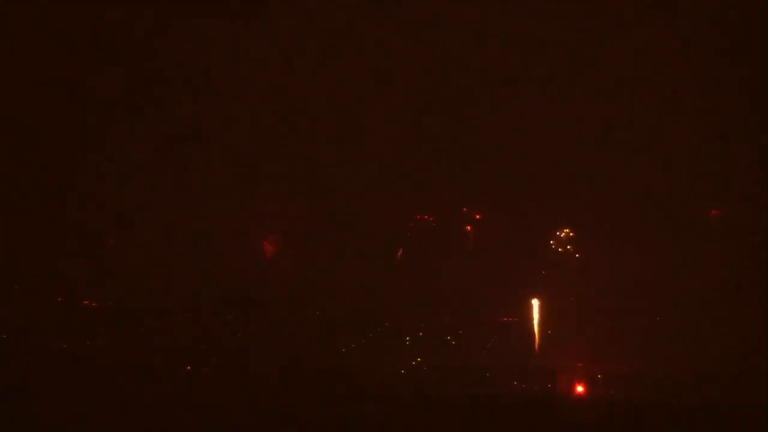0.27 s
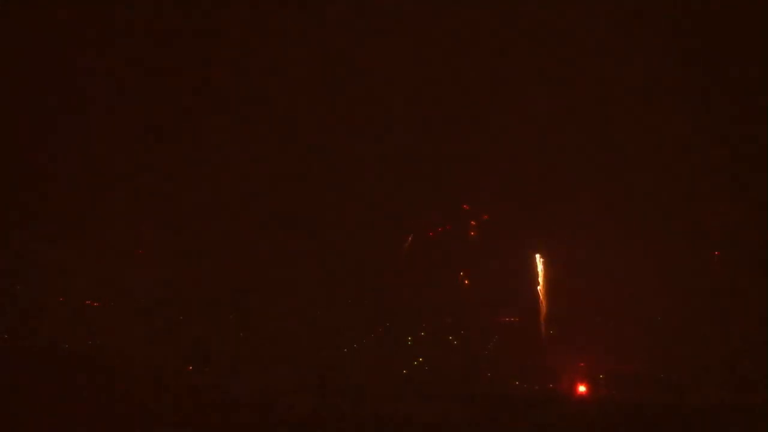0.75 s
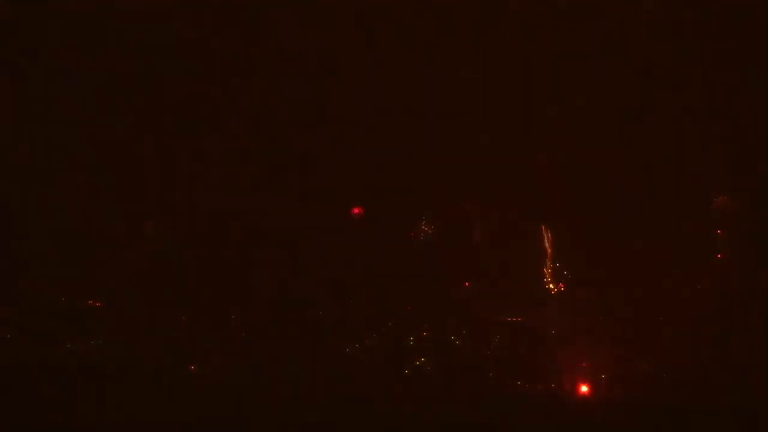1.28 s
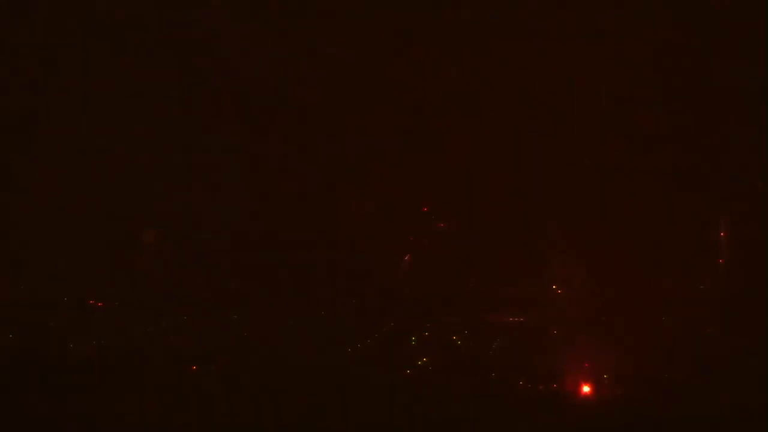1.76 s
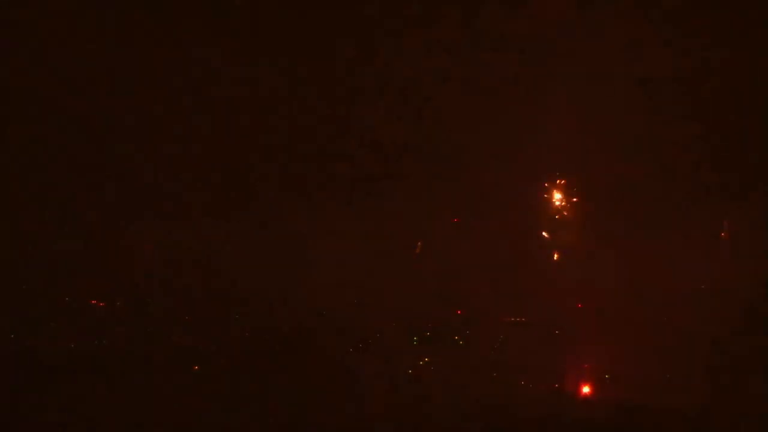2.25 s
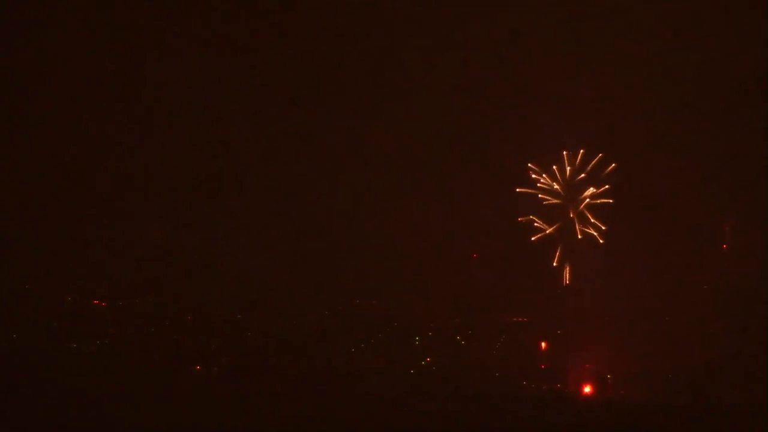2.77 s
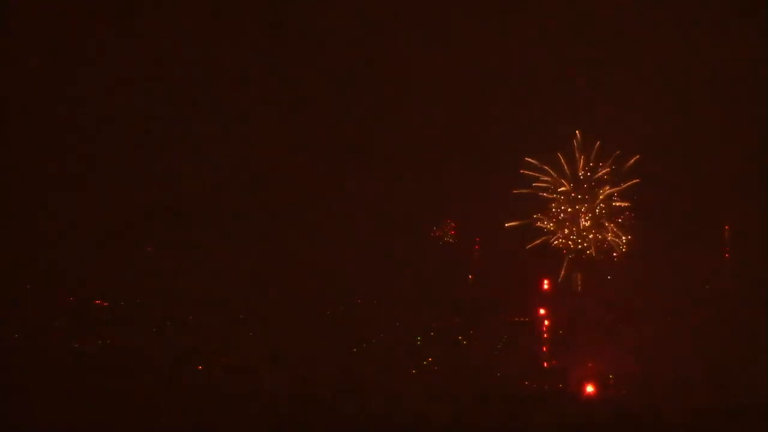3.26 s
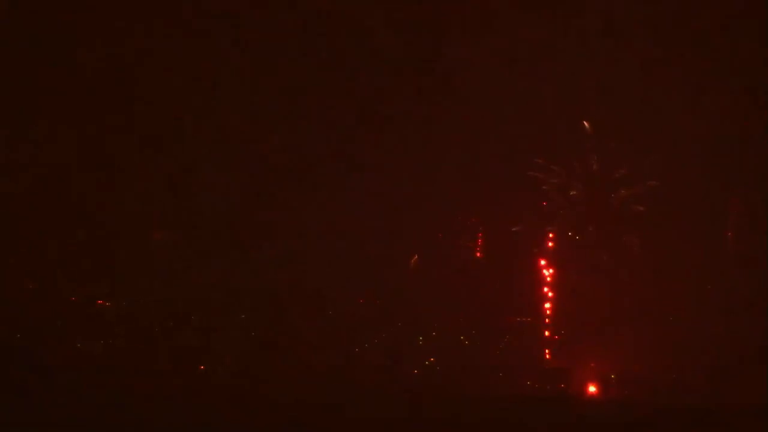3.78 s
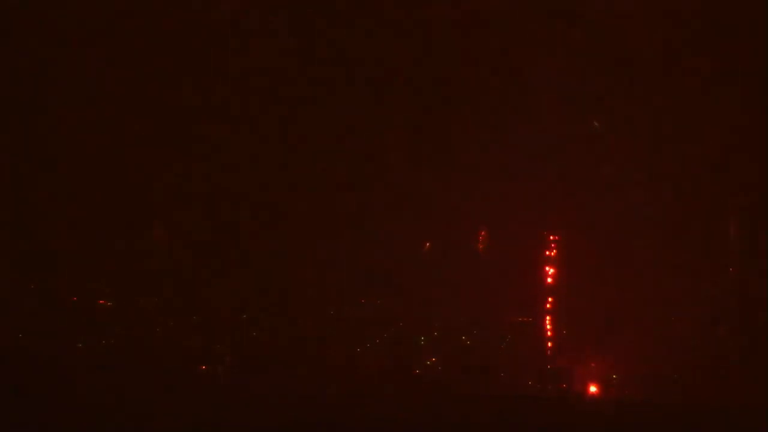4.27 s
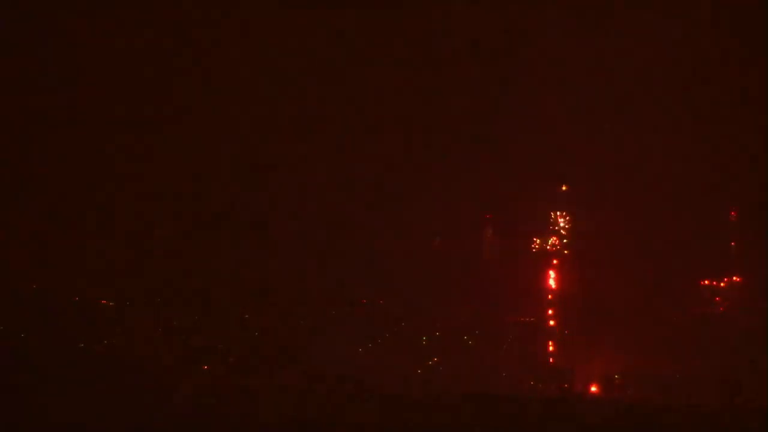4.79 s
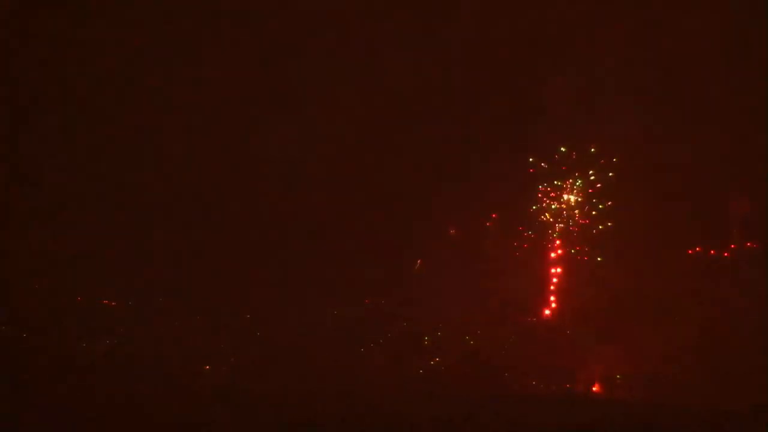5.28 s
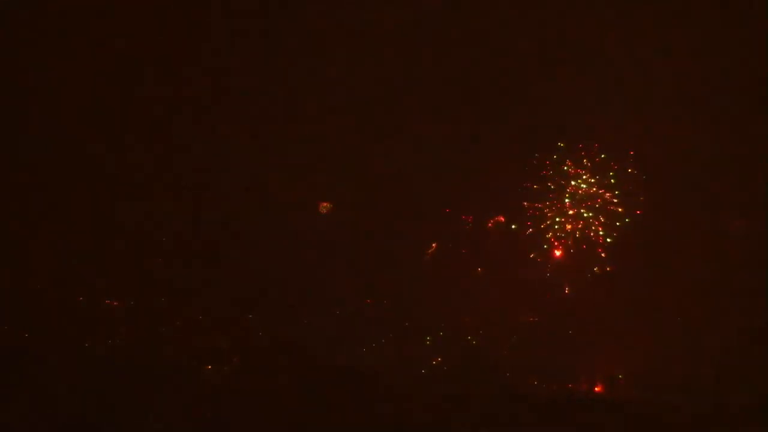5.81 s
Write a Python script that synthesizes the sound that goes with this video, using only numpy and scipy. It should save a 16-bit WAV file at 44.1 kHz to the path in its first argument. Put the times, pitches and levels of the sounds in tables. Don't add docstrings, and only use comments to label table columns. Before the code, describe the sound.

Outdoors, far from the launch sites, mortar booms, dull knocks, shell bangs and dry cracks overlap with short echoes off buildings. The middle thins to separate pops, then one violent crack breaks through, followed by a deep boom and crowded bangs to the end. The sound is dark and compressed, faintly ticking, with a constant rumble of faraway fireworks beneath.

```python
import sys
import numpy as np
from scipy import signal
from scipy.fft import rfft, irfft
from scipy.io import wavfile
from scipy.ndimage import uniform_filter1d

SR = 44100
rng = np.random.default_rng(int(sys.argv[2]) if len(sys.argv) > 2 else 0)


def wav_record(signal):
    frames = np.transpose(np.atleast_2d(signal))
    bounded = np.clip(frames, -1, 1)
    quanta = np.round(bounded * 32767).astype(np.int16)
    wavfile.write(sys.argv[1], SR, quanta)


def invert_db(x):
    u = np.asarray(x, float) / 20
    return 10 ** u


N = 266364

# [f/Hz, level/dB per Hz]
DISTANCE_COLOUR = [(20, -32), (60, -13), (130, -4), (330, 0.5), (470, -3.5), (700, -14), (1000, -21),
                   (1530, -14.5), (2000, -22), (2300, -30.5), (2750, -31), (2990, -24.5), (3250, -33.5),
                   (3550, -41), (4800, -51), (5150, -62), (5600, -65.5), (6000, -100)]


def band(lo_hz, hi_hz):
    hz = np.maximum(np.arange(2049) * SR / 4096, 1)
    f, db = np.transpose(DISTANCE_COLOUR)
    gain = invert_db(np.interp(np.log(hz), np.log(f), db))
    gain = gain / np.sqrt((1 + (lo_hz / hz) ** 6) * (1 + (hz / hi_hz) ** 6))
    cepstrum = irfft(np.log(gain + 1e-7))
    cepstrum[1:2048] *= 2
    cepstrum[2049:] = 0
    response = irfft(np.exp(rfft(cepstrum)))
    return response / np.sqrt(np.sum(response ** 2))


def through(x, response):
    return signal.fftconvolve(x, response)[:len(x)]


def add(out, s, sound):
    i = int(s * SR)
    out[i:i + len(sound)] += sound[:N - i]


def pulse(hz, cycles, rise):
    turns = np.arange(int(8 * SR / hz)) * hz / SR
    shape = -np.sin(2 * np.pi * turns) * turns ** rise * np.exp(-turns / cycles)
    return shape / np.abs(shape).max()


def thuds(table, t60_s, cycles, rise, late_s, echo_db, spread_db, first_s, count=40):
    out = np.zeros(N)
    chance = rng.random((len(table), 3, count))
    for (s, db, hz, share_db), (when, size, sign) in zip(table, chance):
        lag = first_s + t60_s * when
        echo_level_db = echo_db + share_db - 60 * lag / t60_s + spread_db * size
        echoes = invert_db(echo_level_db) * np.sign(sign - .5)
        train = np.zeros(SR)
        train[0] = 1
        np.add.at(train, np.minimum(lag * SR, SR - 1).astype(int), echoes)
        train = train[:int(lag.max() * SR) + 4000]
        add(out, s + late_s, invert_db(db) * through(train, pulse(hz, cycles, rise)))
    return out


def shocks(table, t60_s, shock=1, rise_s=0.0016):
    out = np.zeros(N)
    t = np.arange(SR // 4) / SR
    snap = 0.73 * np.exp(-(t / 0.0026) ** 2) * (1 - np.exp(-t / rise_s))
    ground_s = 0.0022
    direct = np.zeros(len(t))
    direct[[8, 8 + int(ground_s * SR)]] = -1
    bands = [band(1050, 2300), band(2300, 3600), band(3600, 9000)]
    noises = rng.standard_normal((len(table), 2, len(t)))
    for (s, db, edge_db, top_db, tail_db), (grit, diffuse) in zip(table, noises):
        tail = invert_db(tail_db - 60 * t / t60_s) * (1 - np.exp(-t / 0.0058))
        for response, share_db in zip(bands, [-5.5, edge_db - .5, top_db - 10.5]):
            front = through(shock * direct + grit * snap, response)
            front = front / np.abs(front).max()
            echoes = 0.34 * through(diffuse * tail, response)
            add(out, s, invert_db(db + share_db) * (front + echoes))
    return out


def afterwash(table, db, t60_s):
    power, t = np.zeros(N), np.arange(SR) / SR
    for s, peak_db, _, share_db in table:
        decay = invert_db(2 * (peak_db + share_db + db - 60 * t / t60_s))
        add(power, s, decay * (1 - np.exp(-t / 0.014)) ** 2)
    return power


# [t/s, level/dB]
FAR_SKY = [(0.0, -16.5), (0.55, -26.5), (0.72, -25), (1.23, -24.5), (1.53, -21), (1.98, -28.5),
           (2.349, -20), (2.78, -23), (2.96, -24.5), (3.25, -29.5), (3.4, -25), (3.99, -31.5),
           (4.39, -18.5), (4.61, -25.5), (4.73, -24.5), (5.13, -29), (5.62, -13), (6.04, -18)]


def roll():
    per_s, t60_s, quiet_db = 70, 0.13, -22
    s, sky_db = np.transpose(FAR_SKY)
    busy_db = np.interp(np.arange(N) / SR, s, sky_db - quiet_db)
    when, size, own = rng.random((3, 600))
    starts = np.minimum(np.cumsum(-np.log(when) / per_s) * SR, N).astype(int)
    decay = invert_db(-60 / (t60_s * SR))
    # band edges [Hz], level [dB], share of the busyness, near wash, shift of the draw
    parts = [((10, 200), -2.5, 0.63, afterwash(BOOMS, -4, 0.092), 0),
             ((200, 800), -1, 0.45, afterwash(BANGS + MORE_BANGS, -9.5, 0.29), .33),
             ((800, 9000), -12, 0.5, afterwash(BANGS + MORE_BANGS, -21.5, 0.27), .67)]
    out = 0
    for edges, part_db, follow, near, shift in parts:
        burst_db = -3.5 * np.log(0.053 + size) + 19.0 * ((own + shift) % 1 - .5)
        bursts = np.zeros(N + 1)
        np.add.at(bursts, starts, invert_db(burst_db))
        wash = signal.lfilter([1], [1, -decay], bursts[:N])
        wash = uniform_filter1d(wash, int(0.001 * SR) + 1)
        wash = 1.68 + wash / wash.mean()
        noise = through(wash * rng.standard_normal(N), band(*edges))
        power = invert_db(2 * (quiet_db + part_db + follow * busy_db)) + near
        out = out + np.sqrt(power) * noise / np.sqrt(np.mean(wash ** 2))
    return out


# [t/s, level/dB, brightness/dB, echo share/dB]
CRACKLES = [(0.12, -18, 11, -3.5), (0.2502, -17.5, 6.5, 7), (0.3433, -12.5, 4, -2),
            (0.4467, -24.5, 16.5, -8), (0.4724, -14.5, 4, 9.5), (0.635, -32, -8, -5),
            (0.6768, -15, 2.5, 7.5), (0.812, -23, 6, 6.5), (0.945, -21, -13, 10.5),
            (1.039, -16.5, 6.5, -21), (1.131, -22, -16, 6), (1.391, -17.5, 2, 3), (1.998, -15, -2, 4),
            (2.2271, -22, 7.5, 5.5), (2.435, -33.5, 5, 0), (2.7993, -21, -3.5, -5), (3.298, -25, 3, 7),
            (3.3667, -26, -4, -0.5), (3.497, -15.5, 3.5, 2), (3.593, -22, 10, 1), (3.646, -22, 8.5, -4),
            (4, -16.5, -2, 3.5), (4.551, -9, 3.5, 2), (4.658, -31.5, -2, -13.5), (4.7124, -15, 0, -3),
            (4.7398, -15.5, 6.5, 3.5), (5.397, -19, 12.5, 0), (5.658, -17, -7, -1), (5.77, -21, 5, 12),
            (5.979, -21, 3, 16)]


def crackles():
    far = []
    for s, db, bright_db, tail_db in CRACKLES:
        far.append((s, db, -13.5 + bright_db, -40 + 0.8 * bright_db, tail_db))
    return shocks(far, 0.19, shock=.4, rise_s=0.0012)


# [t/s, level/dB, 3 kHz share/dB, 4.5 kHz share/dB, echo share/dB]
LATE_CRACKS = [(0.69, -19, -16.5, -22, 1.5), (1.342, -11, -7, -20, 2.5), (1.44, -13.5, -10.5, -29, 1),
               (1.642, -23, -4.5, -23, 3.5), (2.24, -14, -4, -15, -16), (2.31, -27, -8, -25, -10),
               (2.45, -22, -4.5, -20, -6), (2.7, -18.5, 4, -17, -5.5), (3.21, -8, -9.5, -17, -5.5),
               (4.317, -14.5, -5, -20, -1), (5.45, -17, -5, -13, -0.5), (5.8, -23, -10, -22, -9),
               (3.3925, -17, 2, 1, -4), (0.472, -17, -14, -13, 0.5), (3.594, -22.5, -8.5, -17, 2),
               (1.76, -19.5, -7, -14, 3.5), (3.78, -23, -6, -21, 1), (3.88, -26, -8, -20, 4)]


def late_cracks():
    return shocks(LATE_CRACKS, 0.19, shock=.3, rise_s=0.00074)


# [t/s, level/dB, pulse f/Hz, echo share/dB]
KNOCKS = [(0.219, -28, 534, 2.5), (0.253, -14, 494, 2), (0.303, -20, 501, -2), (0.355, -15, 570, 4.5),
          (0.475, -23.5, 640, 1), (0.632, -12.5, 501, -2), (0.735, -26, 506, 0), (1.504, -25, 614, 3),
          (1.614, -23.5, 581, -7), (1.73, -26, 511, -4), (1.779, -18, 568, 1), (2.23, -22, 510, 4.5),
          (2.273, -29, 503, -0.5), (2.304, -19, 710, 3), (2.562, -19, 543, -1), (2.669, -23, 528, 7),
          (2.695, -13.5, 550, 3.5), (2.799, -14, 587, 6), (2.867, -21, 501, 9), (2.904, -18, 506, 0),
          (3.197, -11.5, 534, -1), (3.303, -16, 504, 2), (3.368, -22, 503, 2), (3.497, -17, 610, 3),
          (3.595, -14, 519, -0.5), (3.82, -24, 510, -8), (3.999, -21, 527, 8), (4.17, -17, 540, 7),
          (4.318, -17, 526, 0), (4.343, -7, 525, 3.5), (4.449, -12, 584, 4), (4.547, -14, 658, 2),
          (4.742, -8.5, 490, -1), (4.803, -8, 504, 1.5), (4.877, -6.5, 506, 8), (5.004, -12, 515, -11),
          (5.173, -21, 568, 4), (5.278, -21, 592, 6), (5.393, -14, 516, 9), (5.442, -6.5, 513, 9),
          (5.536, -23, 530, 3), (5.966, -27, 510, 11)]


def knocks():
    return invert_db(-3) * thuds(KNOCKS, 0.074, cycles=0.69, rise=0.77, late_s=-.001, echo_db=-5.5,
                           spread_db=9.5, first_s=0.00083, count=20)


# [t/s, level/dB, pulse f/Hz, echo share/dB]
SLAPS = [(0.127, -4.5, 196, 4), (0.264, -14, 166, -1), (0.277, -3, 169, -2), (0.3, -12, 170, -3),
         (2.085, -12.5, 130, -3), (3.1995, -5, 336, -1), (3.204, -2.5, 332, -2), (3.217, -8, 300, -11),
         (3.231, -6, 280, 10), (4.1737, -4.5, 300, 3), (4.221, -11, 302, -3), (4.36, -11, 150, 2),
         (4.7995, -15.5, 344, -3), (0.7, -17.5, 333, 3), (1.445, -6, 336, -5), (1.731, -8, 336, 6),
         (2.268, -7, 320, 2.5), (2.6, -13, 303, 6), (2.737, -16, 347, 0), (5.365, -17, 253, 13),
         (5.565, -17, 308, 10), (5.78, -11, 299, 6), (5.83, -9, 257, 4), (5.895, -7.5, 280, 3),
         (6.017, -8.5, 256, 10.5), (6.027, -3, 225, 19), (0.116, -6, 330, 2), (0.27, -10.5, 380, 5),
         (4.325, -13.5, 380, 4), (4.68, -18, 85, 7), (4.895, -17, 520, 14)]


def slaps():
    return thuds(SLAPS, 0.039, cycles=0.29, rise=2.1, late_s=0.00034, echo_db=-12.0,
                 spread_db=5.0, first_s=0.0035, count=20)


# [t/s, level/dB, 3 kHz share/dB, 4.5 kHz share/dB, echo share/dB]
CRACKS = [(0.1106, -2.5, -11.5, -5, 2.5), (0.9048, -12, -22, -33, 1.5), (1.3289, -10.5, -5.5, -27, 0),
          (1.508, -10, -39, -33.5, -3), (2.34, -27, -28, -37, -21), (2.3926, -3.5, -34, -30, -20),
          (2.5590, -6.5, -14, -37, -15), (2.6934, -10, -31, 1.5, -6), (3.1958, 9, -3, -2.5, -14.5),
          (3.3918, -9.5, 6, 3.5, -8.5), (4.1732, -3.5, 0.5, -22, -8), (4.3303, -12, -14.5, -1, 9),
          (4.3419, -1.5, -6.5, -28, 1), (4.4491, -7, -9.5, -53, 1.5), (4.8036, -8.5, -10, -46, 4),
          (4.882, -7, -8.5, -22, 6.5), (4.9035, -8, 0, -9.5, -0.5), (5.003, -15.5, -13.5, -37, 7.5),
          (5.1139, -5.5, -10, -39.5, -1), (5.1775, -10.5, -16, -38, 6), (5.4405, 2, -9, -7.5, 1),
          (5.5398, -11, -15, -43, 2.5), (5.621, -12.5, -1, -30, -33), (2.2816, -11.5, -21, -30, 2)]


def cracks():
    return shocks(CRACKS, 0.11)


# [t/s, level/dB, pulse f/Hz, echo share/dB]
BANGS = [(0.117, -1, 257, -2.5), (0.249, -3.5, 223, 0.5), (0.713, -12, 414, 5.5), (1.026, -9, 347, 0),
         (1.166, -10.5, 278, 1), (1.419, -10, 430, 2), (1.503, -5, 371, 4), (2.328, -15, 392, 11),
         (2.588, -14, 325, 6), (2.667, -12.5, 409, 11), (2.941, -6.5, 416, -12), (2.99, -9, 400, 3.5),
         (3.135, -10.5, 313, 4.5), (3.1929, -4, 368, -1), (3.307, -13, 248, 9.5), (3.392, -5.5, 367, 1),
         (3.592, -6.5, 324, -0.5), (3.823, -8.5, 405, -2.5), (4.169, -9.5, 346, 10.5),
         (4.334, -3.5, 208, 0), (4.446, -9.5, 297, 3), (4.739, -8.5, 318, -0.3), (4.802, -1.5, 352, -3),
         (4.88, -6.5, 318, 7), (5.173, -4.5, 315, 4.5), (5.275, -7, 320, -22), (5.537, -8, 526, 6.5),
         (5.661, -9.5, 244, 4), (5.764, -10, 301, 8.5), (5.995, -7.5, 293.5, 7)]
# [t/s, level/dB, pulse f/Hz, echo share/dB]
MORE_BANGS = [(0.487, -12.5, 355, 9.5), (0.626, -12, 226, -2), (0.671, -13.5, 236, 11.5), (0.853, -8, 366, 3),
              (0.943, -10, 371, -0.5), (1.252, -11.5, 362, -0.5), (1.386, -8, 305, 4.5), (1.641, -13, 360, -1),
              (1.86, -11, 292, 5), (1.964, -17.5, 315, 13), (2.228, -7, 366, 0), (2.437, -7, 424, -1),
              (2.56, -11.5, 427, 2), (2.733, -9.5, 339, -18), (2.789, -14, 359, 7.5), (2.868, -10.5, 450, -8),
              (2.905, -15.5, 326, 4), (3.368, -12, 369, -2), (3.535, -8.5, 352, 3.5), (3.72, -10, 318, -1.5),
              (3.763, -12.5, 367, 1), (3.948, -11.5, 330, -5), (4.003, -11, 414, -6.5), (4.233, -9, 240, 2),
              (4.55, -9, 420, 3.5), (4.638, -9, 306, -4), (4.953, -12.5, 378, -7), (5.001, -11.5, 350, -18),
              (5.052, -14, 306, 8), (5.437, -12, 237, 7)]


def bangs():
    return thuds(BANGS + MORE_BANGS, 0.13, cycles=0.62, rise=2.25, late_s=0.00045, echo_db=-12.5,
                 spread_db=2.5, first_s=.004)


# [t/s, level/dB, pulse f/Hz, echo share/dB]
BOOMS = [(0.111, -3, 159, 4.5), (0.246, -3, 115, 1), (0.477, -8, 118, -7), (0.614, -21, 104, 1.5),
         (0.858, -12, 191, 0), (1.011, -23, 172, 10.5), (1.377, -10, 150, 2), (1.48, -17, 182, 7),
         (1.857, -14.5, 153, 0.5), (1.953, -16, 150, 6), (2.063, -5.5, 134, 5), (2.348, -19, 126, 1.5),
         (2.551, -17.5, 184, -8.5), (2.64, -24, 110, 6.5), (3.116, -17, 122, 1), (3.3, -8, 174.4, -6),
         (3.526, -17.5, 127, 7), (3.988, -14.5, 160, -10), (4.171, -12.5, 196, 8), (4.311, 3, 150, -6),
         (4.483, -15, 121, -15), (4.553, -16.5, 137, -10), (4.626, -22, 110, 5), (4.876, -20, 182, 2.5),
         (5.166, -11, 204, 4), (5.351, -15.5, 110, 6), (5.433, -14.5, 109, -1), (5.552, -11.5, 139, -6),
         (5.641, -24, 101.5, 10.5), (5.82, -11, 196, 4)]


def booms():
    return -thuds(BOOMS, 0.22, cycles=0.24, rise=4.9, late_s=.004, echo_db=-14.0,
                  spread_db=15.5, first_s=.008)


def scene():
    background = roll() + crackles() + late_cracks()
    near = knocks() + slaps() + cracks() + bangs() + booms()
    return (background + near)[None]


# [t/s, length/s, tick treble level/dB]
HUNTS = [(0.076, 0.075, -55.5), (0.15, 0.075, -67.5), (0.329, 0.059, -65.5), (0.436, 0.059, -76),
         (0.54, 0.013, -67.5), (0.622, 0.043, -63), (0.665, 0.045, -69.5), (0.798, 0.069, -69.5),
         (0.9, 0.013, -69.5), (1.03, 0.024, -65.5), (1.158, 0.029, -67.5), (1.31, 0.04, -63.5),
         (1.5, 0.051, -64), (1.641, 0.013, -75), (1.761, 0.04, -73), (1.881, 0.019, -67.5),
         (2.017, 0.043, -67.5), (2.116, 0.021, -67.5), (2.15, 0.04, -72), (2.204, 0.064, -69.5),
         (2.268, 0.064, -67), (2.377, 0.035, -66.5), (2.425, 0.04, -61), (2.465, 0.04, -68),
         (2.548, 0.04, -65), (2.67, 0.04, -61.5), (2.804, 0.024, -72), (2.865, 0.016, -65.5),
         (3.041, 0.043, -70), (3.188, 0.027, -67.5), (3.302, 0.035, -62), (3.366, 0.061, -61.5),
         (3.486, 0.013, -67.5), (3.518, 0.037, -72), (3.617, 0.013, -65), (3.644, 0.016, -72.5),
         (3.705, 0.045, -71), (3.769, 0.045, -74), (3.948, 0.013, -66.5), (3.996, 0.029, -64.5),
         (4.1, 0.051, -69), (4.15, 0.053, -59.5), (4.249, 0.048, -67.5), (4.334, 0.029, -63.5),
         (4.436, 0.035, -63), (4.54, 0.04, -63), (4.724, 0.069, -67.5), (4.793, 0.069, -68.5),
         (4.862, 0.072, -62), (4.95, 0.021, -68.5), (4.998, 0.024, -67.5), (5.084, 0.064, -68),
         (5.172, 0.024, -60.5), (5.342, 0.072, -67), (5.414, 0.072, -64.5), (5.486, 0.072, -63),
         (5.593, 0.051, -64), (5.724, 0.045, -68), (5.769, 0.045, -68.5), (5.966, 0.043, -67.5)]


def jumps(x):
    block_s, first_block_s, settle_s, rounding = 128 / 48000, .001934, .001, .55
    edges = np.arange(first_block_s, N / SR, block_s)[:, None]
    s, length, db = np.transpose(HUNTS)
    inside = (edges > s) & (edges < s + length)
    hunting = np.sum(invert_db(db + 14) * inside, axis=1)
    at = np.round(edges[:, 0] * SR).astype(int)
    steps = np.zeros(N)
    steps[at] = hunting * rng.standard_normal(len(at)) + invert_db(-62) * x[at]
    blunt = signal.lfilter([1 - rounding], [1, -rounding], steps)
    return signal.lfilter([1], [1, -np.exp(-1 / (settle_s * SR))], blunt)


# [t/s, level/dB, direction +1 or -1]
FRONTS = [
    (3.1966, -4, -1),
    (3.1977, -10, -1),
    (3.199, -9, 1),
    (4.1755, -20, -1),
    (4.1752, -16, -1),
]


def fronts():
    t = np.arange(N) / SR
    width_s = .00016
    return sum(way * invert_db(db) * np.exp(-((t - s) / width_s) ** 2) for s, db, way in FRONTS)


def top_cut(x):
    return signal.sosfilt(signal.butter(12, 15700, fs=SR, output="sos"), x)


def record(dry):
    ceiling, overdrive_db, hiss_db, top_hz = .96, 0.2, -91, 6400
    x = dry * invert_db(overdrive_db) / ceiling + invert_db(hiss_db) * rng.standard_normal(dry.shape)
    x = ceiling * x / (1 + np.abs(x) ** 8) ** (1 / 8)
    x = x + fronts()
    x = signal.sosfiltfilt(signal.cheby2(12, 35, top_hz, fs=SR, output="sos"), x)
    converter_hiss = invert_db(-108) * rng.standard_normal(dry.shape)
    x = np.clip(x + jumps(x[0]) + converter_hiss, -1, 1)
    return top_cut(x)


dry = scene()
out = record(dry)
wav_record(out)
```